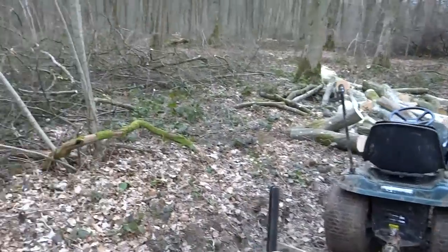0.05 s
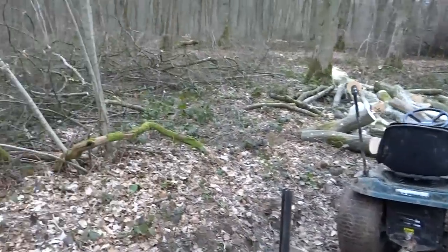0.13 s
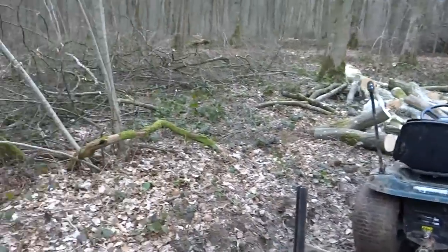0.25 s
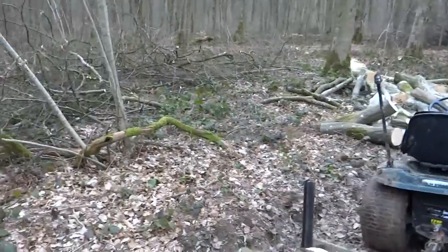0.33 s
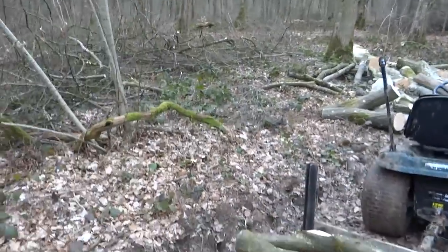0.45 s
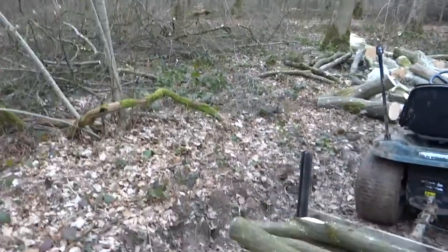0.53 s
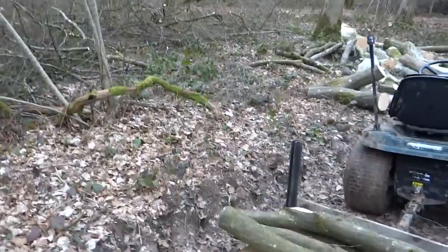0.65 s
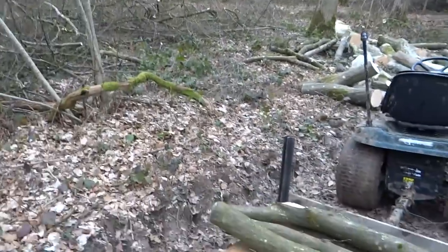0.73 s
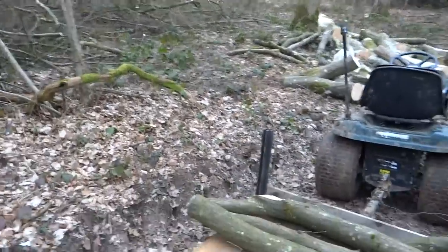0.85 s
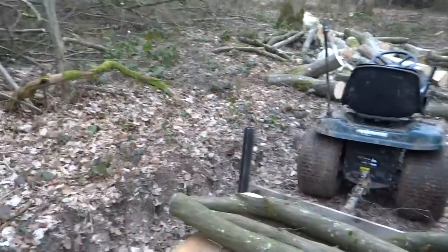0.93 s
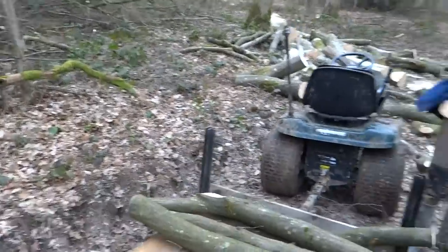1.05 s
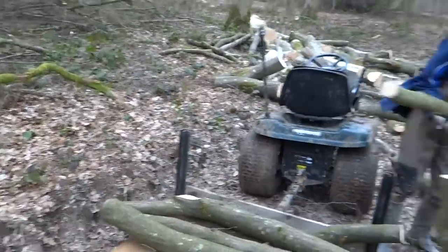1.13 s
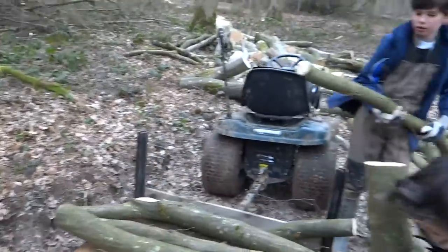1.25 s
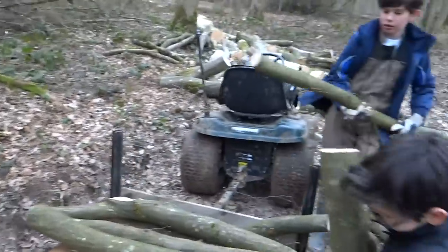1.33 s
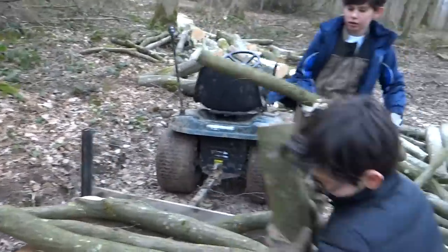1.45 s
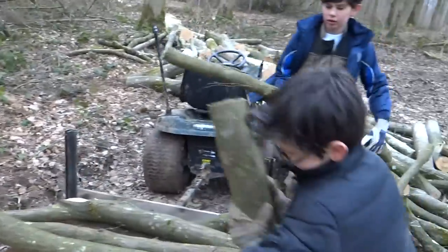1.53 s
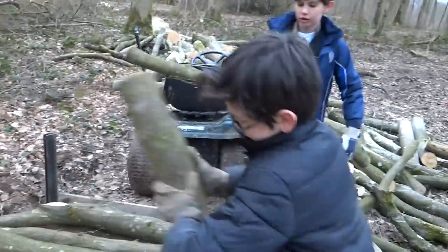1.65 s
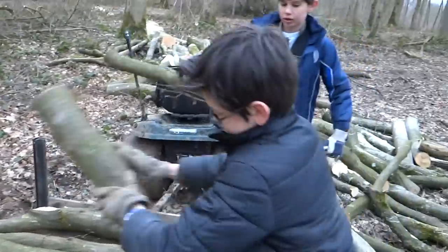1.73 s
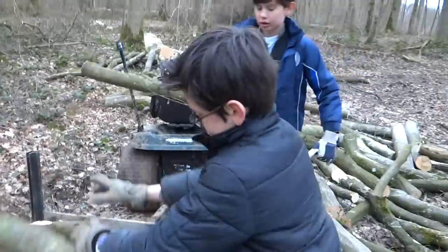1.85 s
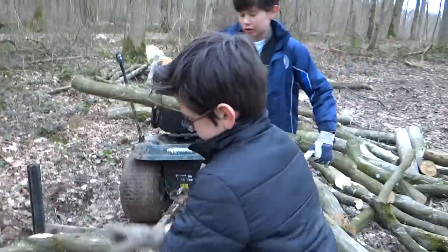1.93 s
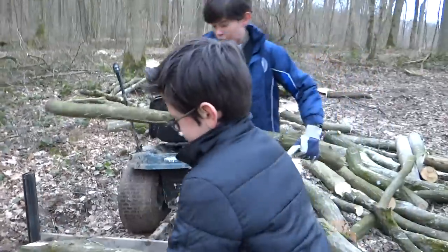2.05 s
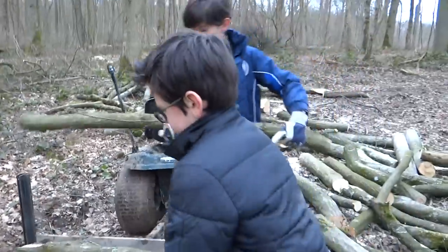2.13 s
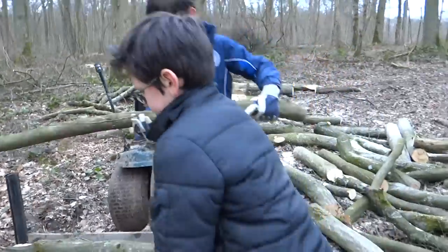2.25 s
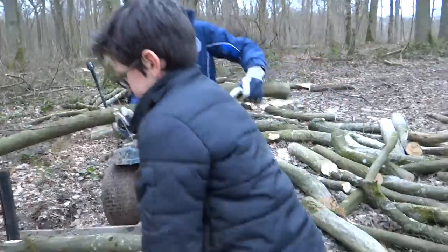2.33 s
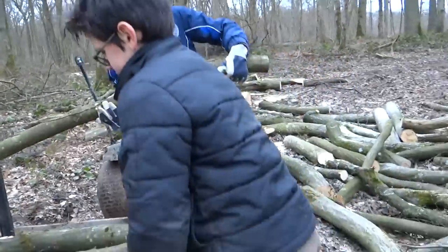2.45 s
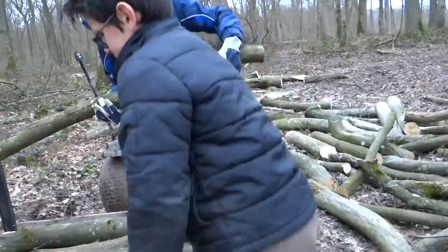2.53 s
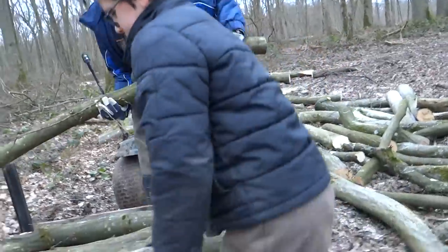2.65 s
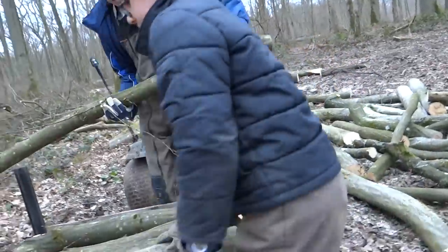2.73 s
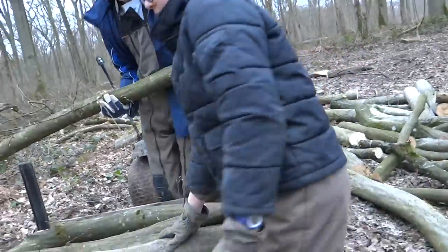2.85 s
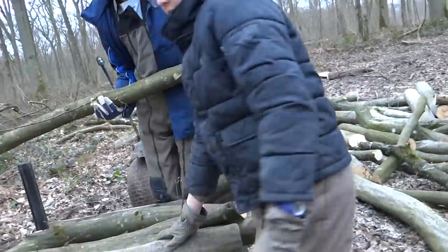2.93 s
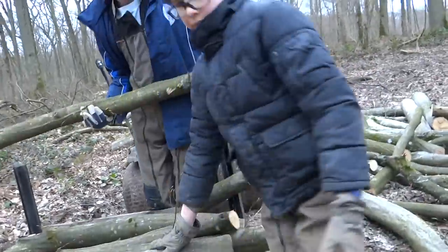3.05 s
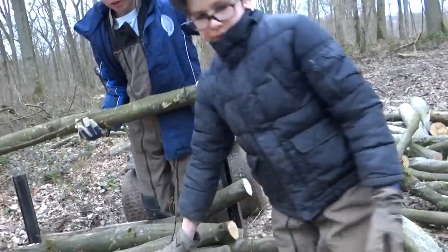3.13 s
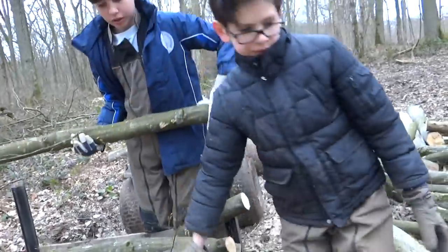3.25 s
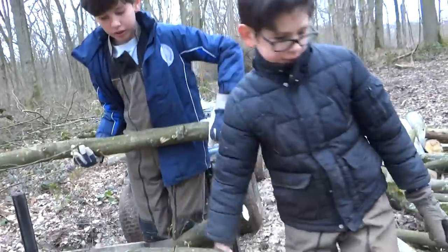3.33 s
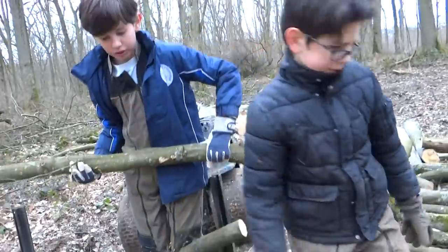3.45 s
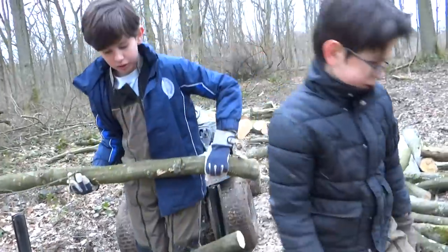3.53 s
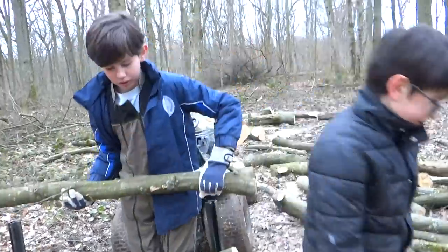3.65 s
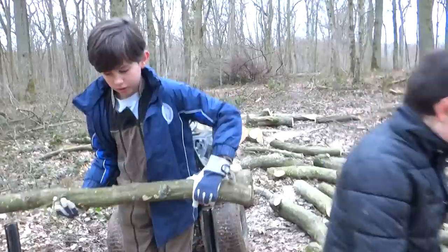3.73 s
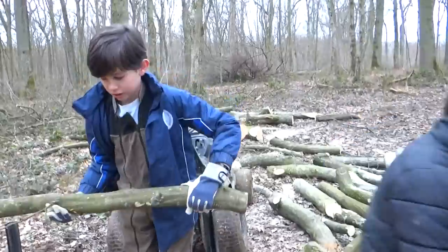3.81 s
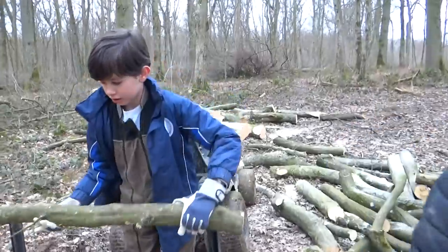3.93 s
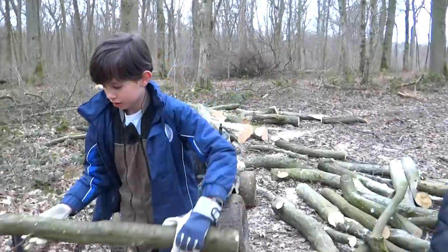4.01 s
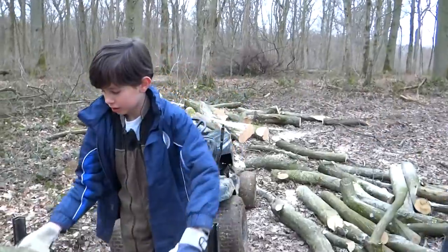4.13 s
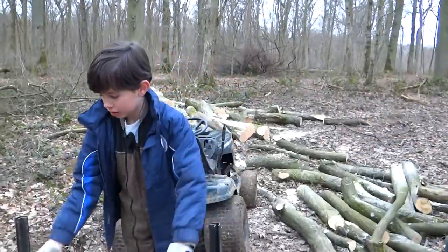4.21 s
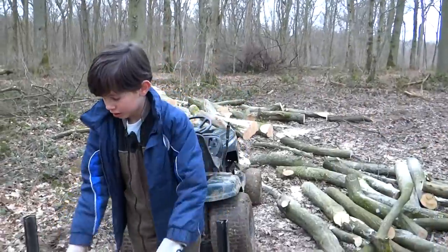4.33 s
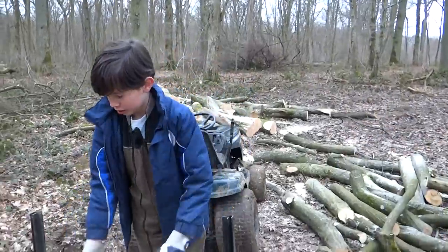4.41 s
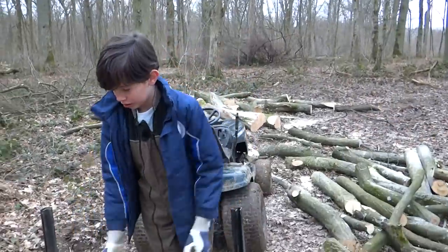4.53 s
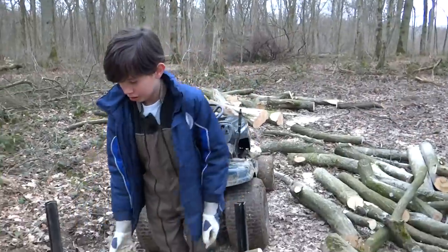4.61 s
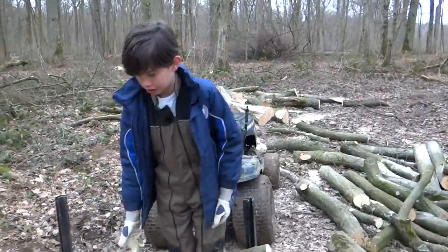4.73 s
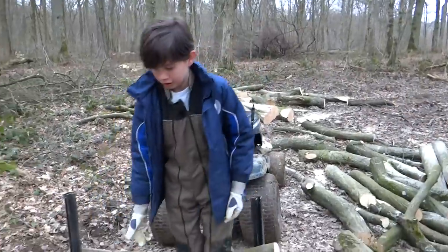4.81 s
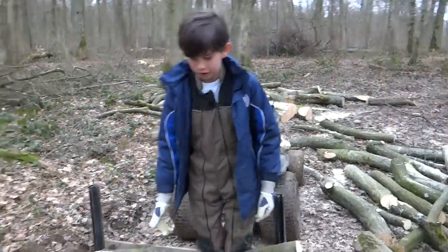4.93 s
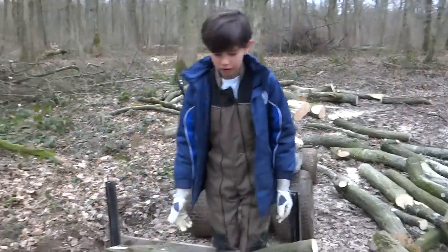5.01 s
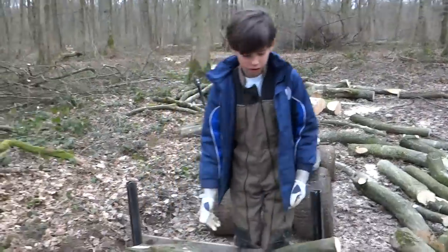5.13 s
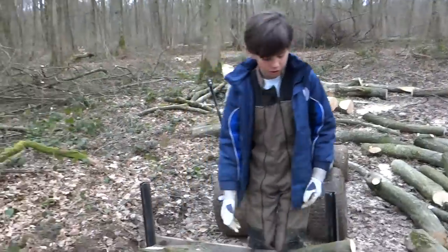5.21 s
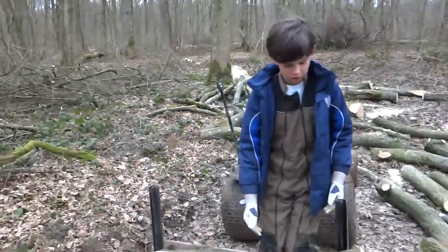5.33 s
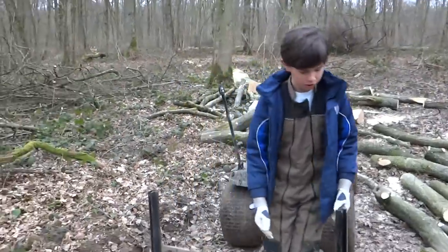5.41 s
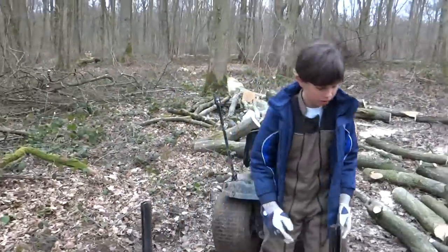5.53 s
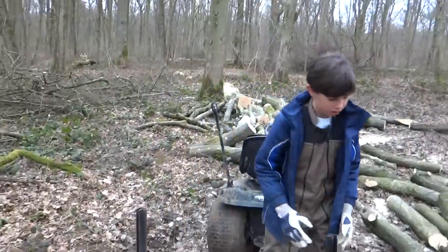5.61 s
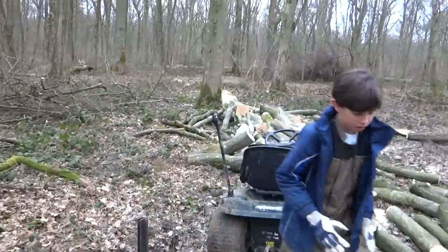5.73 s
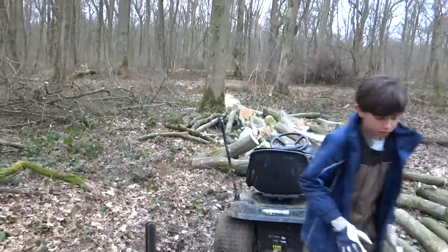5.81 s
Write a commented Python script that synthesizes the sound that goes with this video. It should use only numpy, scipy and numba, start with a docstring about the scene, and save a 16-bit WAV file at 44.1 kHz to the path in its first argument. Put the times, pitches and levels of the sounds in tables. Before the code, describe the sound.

Close to the microphone, a log bangs onto a trailer load at once, booming and clattering for a quarter second. Cloth rustles quietly, then a soft bump leads to a second big tumbling crash. After a near-silent gap come brisk jacket and leaf rustle, glove scuffs and a tiny bark squeak, then a third hard landing with snaps. Open woodland, with a faint dull echo from the trunks.

```python
"""Logs dropped on a trailer

Logs land one by one on a small trailer in a wood: blows and tumbling ring modes of the bed and the logs. Cloth,
gloves and dry leaves rustle, scrape and snap as filtered noise grains; a struck part rings briefly and rubbing
bark squeaks, both as rough tones. Low rumble and a far hush are shaped noise; the load and tree trunks send
back echoes of decaying noise. Two microphone ports behind a casing hear it all, and a limiter holds down the
loudest moments."""
import sys
import numpy as np
from scipy import signal
from scipy.fft import rfft, irfft, next_fast_len
from scipy.io import wavfile
from scipy.ndimage import uniform_filter1d, minimum_filter1d
from numba import njit

SR = 44100
rng = np.random.default_rng(int(sys.argv[2]) if len(sys.argv) > 2 else 0)


def to_wav(s):
    """Save 16-bit WAV."""
    ch = np.atleast_2d(s).T  # columns
    pcm = np.round(np.clip(ch, -1, 1) * 32767)  # PCM
    wavfile.write(sys.argv[1], SR, pcm.astype(np.int16))


N = 258867
T = np.arange(N) / SR
SIZE = next_fast_len(N + 4096)
BINS = np.arange(SIZE // 2 + 1) * SR / SIZE

# Distant wood, shape of its spectrum. Each row: frequency in Hz, relative density in dB per Hz.
AIR_SPECTRUM = [(25, 22.5), (60, 4.5), (250, 6), (800, -16.5), (3000, -7.5), (9000, -27.5), (12500, -9),
                (16000, -31)]
# Wind and handling on the microphone. Each row: time in seconds, middle level in dB.
RUMBLE_LEVELS = [(0.0, -51.5), (1.1, -65), (1.3, -36.5), (1.93, -47), (2.1, -86), (5.87, -86)]
# How much cloth and leaves move. Each row: time in seconds, hiss level in dB.
RUSTLE_LEVELS = [(0.0, -44.5), (0.174, -47.5), (0.39, -40), (0.42, -48), (1.2, -58.5), (1.59, -51),
                 (1.93, -54), (3.1, -58.5), (3.25, -49.5), (3.28, -45.5), (3.41, -46), (3.46, -51.5),
                 (3.63, -47.5), (3.655, -41.5), (3.72, -38.5), (3.76, -36), (3.88, -36), (3.93, -44),
                 (4.07, -37.5), (4.13, -42.5), (4.2, -41.5), (4.39, -43), (4.45, -47), (5.1, -58),
                 (5.36, -52.5), (5.45, -57.5), (5.87, -56.5)]
# Rough tones: first a brief ring of something struck, then rubbing bark. Each row: start in seconds, length in
# seconds, pitch in Hz, level in dB.
ROUGH_TONES = [(0.083, 0.1, 354.4, -39.5), (3.883, 0.038, 1150, -32), (3.911, 0.021, 1150, -23)]
# Twigs snapping and gloves slapping. Each row: start in seconds, body level in dB, hiss level in dB,
# t60 in seconds, centre of the body in Hz.
TWIG_SNAPS = [(0.145, -27, -56.5, 0.014, 1580), (1.542, -39.5, -40.5, 0.022, 2380),
              (1.61, -38, -39.5, 0.078, 2020), (1.713, -31.5, -36.5, 0.012, 2480),
              (1.973, -23, -38, 0.015, 1200), (2.002, -16.5, -33, 0.41, 1930),
              (3.412, -40.5, -41.5, 0.03, 1520), (4.399, -25, -39.5, 0.22, 1820),
              (4.626, -27, -26, 0.065, 2360), (4.968, -46.5, -49.5, 0.36, 1380),
              (5.468, -38, -34, 0.23, 1465), (5.634, -61, -44, 0.066, 900)]
# Blows of a log on the load. Each row: start in seconds, boom of the bed in dB, knock of the wood in dB,
# boom pitch in Hz, knock pitch in Hz.
LOG_BLOWS = [(0.399, -2.5, -13.5, 119.2, 607), (0.42, -10.5, 0, 213.5, 2380),
             (0.461, -5.5, -1.5, 260, 1600), (0.509, -3.5, -14, 304, 1220), (0.527, -6.5, -21, 251, 1940),
             (0.546, -15, -10, 112.5, 2280), (0.572, -9.5, -12.5, 114.4, 1295),
             (0.589, 1.5, -4, 193.7, 655), (0.645, -15, -31, 115, 880), (0.695, -14.5, -33, 103.2, 690),
             (0.884, -26.5, -55, 113.7, 603), (0.974, -19.5, -56, 120.3, 600),
             (1.29, -20.5, -35.5, 172.4, 480), (1.409, -17, -36.5, 126, 475), (1.71, -34, -31, 265, 1100),
             (1.817, -9, -25.5, 164.4, 510), (1.973, 1, -19.5, 206, 583), (1.983, -13.5, -9.5, 172.5, 1860),
             (2.006, -10, -5, 159.8, 2400), (2.017, -4, -8, 142.3, 990), (2.053, 2, 3.5, 267.7, 1230),
             (2.072, -1.5, -4.5, 152.3, 810), (2.103, -4, -2.5, 295.7, 1120),
             (2.137, -3.5, -17, 121.1, 592), (2.211, -4, -16.5, 151.6, 665), (2.24, -18, -8.5, 176, 1580),
             (2.267, -8.5, -17.5, 287, 2300), (2.328, -8, -19.5, 238.7, 1360),
             (4.405, -13, -6.5, 293, 1166), (4.446, -0.5, -12, 172, 1560), (4.469, 3, -5, 146, 1750),
             (4.498, -7, -2.5, 153.4, 863), (4.515, -11, -9.5, 274, 1720), (4.567, -15.5, -12, 203, 1040),
             (4.663, -11, -13, 115.5, 586), (4.671, -3.5, -18.5, 245, 980), (4.69, -9.5, -19.5, 146.5, 780),
             (4.761, -10, -49, 118.4, 605), (4.815, -24, -40.5, 129.6, 594),
             (5.482, -35.5, -32.5, 234, 665)]
# Modes of the trailer bed and load. Each row: frequency in Hz, level in dB, free t60 in seconds.
BED_MODES = [(53.9, -12.5, 0.64), (91.3, -10, 0.42), (120.3, -3, 0.38), (145.2, -4, 0.28),
             (172.3, 0.5, 0.19), (197.5, -1, 0.31), (237.3, -1.5, 0.17), (273.7, 2.5, 0.15),
             (303, 2.5, 0.1), (347, 0.5, 0.065), (411, -9.5, 0.11)]
# Modes of the logs' wood. Each row: frequency in Hz, level in dB, free t60 in seconds.
WOOD_MODES = [(436.7, 2, 0.031), (484, 4, 0.026), (550, 5.5, 0.022), (634, -1.5, 0.045), (720, 1.5, 0.031),
              (824, 1.5, 0.037), (989, -0.5, 0.044), (1164, 4, 0.029), (1415, 1, 0.028),
              (1621, -9.5, 0.019), (1695, -4, 0.013), (1865, -0.5, 0.0091), (2200, 0.5, 0.013),
              (2880, 9.5, 0.0018)]
# A steel rail of the trailer. Each row: frequency in Hz, level in dB, t60 in seconds.
RAIL_MODES = [(304, -32, 0.7)]
# Logs tumbling after a landing. Each row: start in seconds, length in seconds, relative boom in dB,
# knock over boom in dB, lively part in seconds.
LOG_TUMBLES = [(0.403, 0.23, -9, 1, 0.14), (1.289, 0.23, -38.5, -17.5, .02),
               (1.805, 0.11, -26.5, -17.5, 0.015), (1.993, 0.28, -11, 4, 0.073),
               (2.24, 0.11, -24.5, 5, 0.028), (4.403, 0.16, -9.5, 1.35, 0.071),
               (4.653, 0.15, -26.5, 0, 0.018)]
# Bark scraped by gloves. Each row: start in seconds, length in seconds, level in dB, centre in Hz.
GLOVE_SCUFFS = [(1.527, 0.12, -47.5, 547), (3.574, 0.06, -47, 1160), (3.958, 0.051, -35, 1320),
                (4.031, 0.072, -34.5, 1080), (4.133, 0.1, -42, 1930), (5.525, 0.041, -50.5, 1740)]
# The load lies to the left. Each row: frequency in Hz, lead of the left in radians.
LOGS_LEAD = [(40, .4), (250, .5), (1100, .15), (1700, 0)]
# Colour of the microphone behind its casing. Each row: frequency in Hz, gain in dB.
CASING_GAIN = [(20, -16.5), (100, 2), (2800, 1), (3150, -6), (3520, -12), (5700, -2.5), (7400, 5.5),
               (9200, 5.5), (10600, 0), (11400, -13), (13200, -15), (14900, -17), (17000, -9)]
# The two ports. Each row: frequency in Hz, left minus right in dB, lead of the left in radians.
PORT_DIFFERENCE = [(60, 0, 0), (250, -.3, .15), (520, -2.5, .35), (1100, -2.4, .05), (1700, -4.5, -.08),
                   (2560, -11, -.65), (3150, -14, -1.4), (3900, -6, -3.5), (5900, 0, -5.35),
                   (12000, 0, -6.28)]

AIR_DB, AIR_ALIKE = -51.5, 0.98  # level; share of power common to left and right
RISE_SHARE = 0.026  # rise time of a burst as a share of its decay
JOLT_DB, JOLT_T60_S = -8.5, 0.43  # a landing shakes the ground: level against the tumble's boom, decay

RUSTLE_RATE, RUSTLE_SCATTER_DB, RUSTLE_HZ = 1800, 2.5, 1250  # grains per second, size spread, body pitch
FLUTTER_DB, SWELL_DB = 1.3, 1.2  # spread of fast and of slower level changes
CRISP_HZ, CRISP_DB = 3700, 5  # dry leaves lift the bottom of the hiss
RUSTLE_USUAL_DB, BRIGHTEN = -58.5, 0.17  # level where body equals hiss; dB of body lost per dB louder
# bark crumbs shaken loose: hiss against the tumble's knock, body over hiss, fade
GRIT_DB, GRIT_BODY_DB, GRIT_FADE_DB_S = -35, 16.5, 85

SPOT_OCT, KNOCK_OCT = 1, 0.93  # how widely a blow spreads over bed and wood modes round its pitch
LEAD_DB, KNOCK_LEAD_DB = 5.5, 1  # extra level of the bed and wood mode nearest a blow's pitch
SHIFT_MAX = 0.12  # largest share by which the load pulls that mode on to the blow's pitch
REST_S, REST_DB_S = 0.1, 596  # a log bounces free this long, then lies down and damps the ring
THUD_CONTACT_S = 0.0028  # push of a blow on the bed
BED_CONTACT_S, WOOD_CONTACT_S = 0.0012, 0.00031  # push on rail and tumbled bed; push on any wood
RAIL_S = 2.36  # when a log catches the rail

TUMBLE_RATE, TUMBLE_SCATTER_DB, TUMBLE_DB = 700, 2.3, -1  # contacts per second, size spread, overall trim
TUMBLE_RISE_S, TUMBLE_SAG_DB_S = 0.0062, 48  # onset, slow sag
SETTLE_DB_S = 197  # extra fall once at rest
SOFTEN_DB_S = 56  # after the lively part the knock sinks below the boom
ROLL_DAMP = 0.49  # rolling logs shorten the bed's t60 to this share
BED_LIFT = 1.13  # slope towards the upper bed modes while the tumbling is lively
HARD_DB = 0.27  # knock over boom from which a contact reaches all wood modes evenly
DULL_PER_DB = 3  # spectral slope gained for each dB that the knock falls below that
TICK_DB = -35.5  # gain of bark cracking at each small contact

CLUTTER_DB, CLUTTER_T60_S = -9.5, 0.026  # first reflections off the load and tractor
TRUNKS_DB, TRUNKS_T60_S, TRUNKS_ALIKE = -26, 1.316, 0.75
TRUNKS_LOW_HZ, TRUNKS_HIGH_HZ = 475, 2980

LIMIT_DB, LIMIT_RATIO, RELEASE_S, AHEAD_S = -4.5, 9, 0.02, 0.002
TOP_HZ = 15850


def undb(db):
    """Decibels to gain."""
    return 10 ** (np.asarray(db) / 20)


def unit(x):
    """Scale to rms 1."""
    return x / np.sqrt(np.mean(x ** 2))


def along(table, hz):
    """Read a (Hz, value) table on a log-frequency axis."""
    f, v = np.transpose(table)
    return np.interp(np.log(np.maximum(hz, 1)), np.log(f), v)


def band(x, lo_hz, hi_hz):
    """Band-pass."""
    edges = [lo_hz, min(hi_hz, SR / 2.1)]
    return signal.sosfilt(signal.butter(2, edges, "band", fs=SR, output="sos"), x)


def walk(rate):
    """Random levels, slewed over 1 / rate seconds from one to the next; rms about 1."""
    k = int(SR / rate)
    steps = np.repeat(rng.standard_normal(N // k + 1), k)
    return unit(uniform_filter1d(steps, k)[:N])


def burst(s, db, t60):
    """Envelope of sudden noises that die away by 60 dB in t60 seconds."""
    out = np.zeros(N)
    for start, gain, decay in zip(s, undb(db), np.broadcast_to(t60, len(s))):
        i = int(start * SR)
        n = min(int(decay * SR), N - i)
        age = np.arange(n) / (decay * SR)
        out[i:i + n] += gain * np.minimum(age / RISE_SHARE, 1) * np.exp(-np.log(1000) * age)
    return out


def grains(rate, scatter_db):
    """Sparse clicks of uneven size, rms 1."""
    hit = rng.random(N) < rate / SR
    return unit(hit * rng.standard_normal(N) * undb(scatter_db * rng.exponential(size=N)))


def heard(x, hz):
    """Scale so that the level is as heard behind the casing near hz."""
    return unit(x) / undb(along(CASING_GAIN, hz))


def alike(share, size):
    """Two noises that have a share of their power in common."""
    share = np.clip(share, 0, 1)
    both, left, right = rng.standard_normal((3, size))
    return np.sqrt(share) * both + np.sqrt(1 - share) * np.array([left, right])


def pair(x, hz, db, rad):
    """Left and right of a spectrum that differ by db in level and rad in phase."""
    half = undb(along(np.c_[hz, db], BINS) / 2) * np.exp(0.5j * along(np.c_[hz, rad], BINS))
    return irfft(x * np.array([half, 1 / half]), SIZE)[:, :N]


def soften(x, contact_s):
    """A contact pushes for a moment, which rounds off its attack."""
    push = np.hanning(int(contact_s * SR) + 3)
    return signal.lfilter(push / push.sum(), [1], x)


def ring(modes, s, gain, share, contact_s):
    """Impulses at times s ring every mode; share holds how much each impulse couples to each mode."""
    out, at = np.zeros(N), np.minimum((s * SR).astype(int), N - 1)
    for k, (hz, db, t60) in enumerate(modes):
        pole = np.exp(2j * np.pi * hz / SR - np.log(1000) / (t60 * SR))
        push = np.bincount(at, gain * share[:, k], N)
        out += undb(db) * signal.lfilter([1], [1, -pole], push).imag
    return soften(out, contact_s)


def air():
    """The far hush of the wood: shaped noise, nearly the same left and right, swelling slowly."""
    size = next_fast_len(N)
    hz = np.arange(size // 2 + 1) * SR / size
    hush = irfft(rfft(alike(AIR_ALIKE, size)) * undb(along(AIR_SPECTRUM, hz)), size)[:, :N]
    return unit(hush) * undb(AIR_DB + 0.29 * walk(1.1))


def rumble():
    """Low gusty pressure on the microphone, and the jolt of each landing, as low-band noise."""
    s, db = np.transpose(RUMBLE_LEVELS)
    start, _, boom_db = np.transpose(LOG_TUMBLES)[:3]
    gusts = undb(np.interp(T, s, db) + 7.1 * walk(6.9))
    jolts = burst(start, boom_db + JOLT_DB, JOLT_T60_S)
    return unit(band(rng.standard_normal(N), 19, 96)) * (gusts + jolts)


def rustle():
    """Fine crackle of nylon, leaves and falling bark crumbs: a hiss and a duller body that flutter apart."""
    move_db = np.interp(T, *np.transpose(RUSTLE_LEVELS))
    start, _, boom_db, knock_db, _ = np.transpose(LOG_TUMBLES)
    grit = burst(start, boom_db + knock_db + GRIT_DB, 60 / GRIT_FADE_DB_S)
    crackle = grains(RUSTLE_RATE, RUSTLE_SCATTER_DB) + 1.04 * rng.standard_normal(N)
    crisp = crackle + undb(CRISP_DB) * band(crackle, CRISP_HZ / 1.01, CRISP_HZ * 1.34)
    hiss = heard(band(crisp, 3300, 20000), 8500)
    hiss *= undb(FLUTTER_DB * walk(60) + SWELL_DB * walk(22))
    body = unit(band(crackle, RUSTLE_HZ / 3.08, RUSTLE_HZ * 1.815)) * undb(FLUTTER_DB * walk(35))
    # louder movement brightens: the body grows less than the hiss
    body_db = move_db - BRIGHTEN * (move_db - RUSTLE_USUAL_DB)
    return (undb(move_db) + grit) * hiss + (undb(body_db) + undb(GRIT_BODY_DB) * grit) * body


def squeaks():
    """Each rough tone comes in quickly, holds with a weak half-pitch undertone and dies away: a brief struck
    ring, or bark that catches and lets go."""
    out, waver = np.zeros(N), 1 + 0.01 * walk(200)
    rough = undb(3.5 * walk(300))
    for s, length, hz, db in ROUGH_TONES:
        swell = np.sin(np.pi * np.sqrt(np.clip((T - s) / length, 0, 1)))
        turn = np.pi * np.cumsum(hz * waver) / SR  # phase at half the pitch
        tone = np.sin(2 * turn) + 0.12 * np.sin(turn) + 0.16 * np.sin(3 * turn)
        out += undb(db) * swell * rough * tone
    return out


def snaps():
    """Short bursts of crackle, each with the pitch of what broke or slapped, under a band of hiss."""
    s, body_db, hiss_db, t60, hz = np.transpose(TWIG_SNAPS)
    crackle = grains(4000, 1.7)
    body = np.zeros(N)
    for start, db, decay, centre in zip(s, body_db, t60, hz):
        body += burst([start], [db], decay) * unit(band(crackle, centre / 1.5, centre * 1.5))
    return body + burst(s, hiss_db, t60) * heard(band(crackle, 7400, 11200), 8500)


def near_pitch(modes, hz, octaves):
    """Weights of the modes round each pitch, unit power."""
    spot = np.exp(-(np.log2(np.array(modes)[:, 0] / hz[:, None]) / octaves) ** 2 / 2)
    return spot / np.sqrt(np.sum(spot ** 2, axis=1, keepdims=True))


def strike(modes, s, blow_db, pitch_hz, octaves, contact_s, lead_db):
    """Each blow rings the modes round its pitch, with either sign; the load pulls the nearest mode to it."""
    hz, db, t60 = np.transpose(modes)
    chance = rng.standard_normal((len(s), 2, len(hz)))
    size = near_pitch(modes, pitch_hz, octaves) * np.sign(chance[:, 0])
    size = size * undb(blow_db[:, None] + db + 2 * chance[:, 1])
    age = T[:SR // 2, None]
    fade = 1000.0 ** (-age / t60) * undb(-REST_DB_S * np.maximum(age - REST_S, 0))
    out = np.zeros(N + len(age))
    for start, pitch, gain in zip((s * SR).astype(int), pitch_hz, size):
        lead = np.argmin(np.abs(np.log(hz / pitch)))
        lead_gain = undb(lead_db * (hz == hz[lead]))
        # all modes move with the leading one
        shift = np.clip(pitch / hz[lead], 1 - SHIFT_MAX, 1 + SHIFT_MAX)
        tone = np.sin(2 * np.pi * hz * shift * age)
        out[start:start + len(age)] += (fade * tone) @ (gain * lead_gain)
    return soften(out[:N], contact_s)


def blows():
    """Every blow booms the bed and knocks the wood as decaying modes; a log also catches the rail."""
    s, boom_db, knock_db, boom_hz, knock_hz = np.transpose(LOG_BLOWS)
    rail = ring(RAIL_MODES, np.array([RAIL_S]), np.ones(1), np.ones((1, len(RAIL_MODES))), BED_CONTACT_S)
    boom = strike(BED_MODES, s, boom_db, boom_hz, SPOT_OCT, THUD_CONTACT_S, LEAD_DB)
    knock = strike(WOOD_MODES, s, knock_db, knock_hz, KNOCK_OCT, WOOD_CONTACT_S, KNOCK_LEAD_DB)
    return boom + knock + rail


def dull(knock_db):
    """Soft contacts reach the upper wood modes less; knock_db is knock minus boom."""
    hz = np.array(WOOD_MODES)[:, 0]
    tilt = (hz / hz[0]) ** (DULL_PER_DB * np.minimum(knock_db - HARD_DB, 0)[:, None])
    return tilt / np.sqrt(np.mean(tilt ** 2, axis=1, keepdims=True))


def tumbling():
    """A dense run of small knocks between logs drives bed and wood modes, and bark ticks at each."""
    s = np.flatnonzero(rng.random(N) < TUMBLE_RATE / SR) / SR
    size = unit(undb(TUMBLE_SCATTER_DB * rng.exponential(size=len(s))))
    boom, knock = np.zeros(len(s)), np.zeros(len(s))
    for start, length, boom_db, knock_db, lively in LOG_TUMBLES:
        age = np.maximum(s - start, 0)
        db = boom_db - TUMBLE_SAG_DB_S * age - SETTLE_DB_S * np.maximum(age - length, 0)
        gain = np.minimum(age / TUMBLE_RISE_S, 1) * undb(db)
        boom += gain
        knock += gain * undb(knock_db - SOFTEN_DB_S * np.maximum(age - lively, 0))
    tilt = dull(20 * np.log10((knock + 1e-9) / (boom + 1e-9)))
    bed = np.array(BED_MODES) * [1, 1, ROLL_DAMP]
    hz = bed[:, 0]
    lift = (hz / np.median(hz)) ** (BED_LIFT * np.minimum(knock / (boom + 1e-9), 1)[:, None])
    out = np.zeros(N)
    for modes, gain, reach, contact_s in ((bed, boom, lift, BED_CONTACT_S),
                                          (WOOD_MODES, knock, tilt, WOOD_CONTACT_S)):
        # a mode struck r times a second holds a power of r g^2 t60 / (4 ln 1000)
        power = sum(undb(2 * db) * t60 for _, db, t60 in modes) * TUMBLE_RATE / (4 * np.log(1000))
        share = reach * rng.standard_normal((len(s), len(modes)))
        out += ring(modes, s, gain * size / np.sqrt(power), share, contact_s)
    tick = np.bincount((s * SR).astype(int), knock * size * rng.standard_normal(len(s)), N)
    tick = tick * np.sqrt(SR / TUMBLE_RATE)
    return undb(TUMBLE_DB) * (out + undb(TICK_DB) * band(tick, 3700, 7500))


def scuffs():
    """Coarse grains of a short rub, heard through the bark's broad resonance."""
    out, grit = np.zeros(N), grains(2500, 0.32)
    for s, length, db, hz in GLOVE_SCUFFS:
        swell = np.sqrt(np.abs(np.sin(np.pi * np.clip((T - s) / length, 0, 1)))) * (T < s + length)
        rub = band(band(grit, hz / 2, hz * 2), hz / 2, hz * 2)
        out += undb(db) * swell * unit(rub)
    return out


def scatter(x, echo, db):
    """Convolve with a left and right echo scaled to a mean energy of db."""
    echo = echo / np.sqrt(np.sum(echo ** 2) / 2)
    return undb(db) * signal.fftconvolve(x[None], echo, axes=1)[:, :N]


def clutter(x):
    """Things close by reflect the sound at once, differently into each port: brief decaying noise."""
    t = np.arange(int(0.06 * SR)) / SR
    echo = alike(0, len(t)) * 1000.0 ** (-t / CLUTTER_T60_S)
    return scatter(x, band(echo, 348, 9000), CLUTTER_DB)


def trunks(x):
    """Tree trunks scatter the sound back as a dull, slowly dying wash."""
    t = np.arange(int(1.5 * SR)) / SR
    echo = alike(TRUNKS_ALIKE, len(t)) * 1000.0 ** (-t / TRUNKS_T60_S)
    echo = echo * (1 - np.exp(-t / 0.0028))  # soft onset
    return scatter(x, band(echo, TRUNKS_LOW_HZ, TRUNKS_HIGH_HZ), TRUNKS_DB)


def scene():
    """Logs, hands and feet near the microphone, their echoes and the wood behind."""
    logs = blows() + tumbling()
    hz, rad = np.transpose(LOGS_LEAD)
    near = pair(rfft(logs, SIZE), hz, 0 * hz, rad)
    hands = rustle() + snaps() + scuffs() + squeaks()
    return near + hands + clutter(logs + hands) + rumble() + trunks(logs) + air()


@njit
def follow(x, attack, release):
    """Envelope that rises fast and falls slowly."""
    y, e = np.empty(len(x)), 0.0
    for i in range(len(x)):
        e += (x[i] - e) * (attack if x[i] > e else release)
        y[i] = e
    return y


def record(dry):
    """Casing colour, two ports that differ in level and phase, a shared limiter and the top cut."""
    # causal response of the casing from the folded cepstrum of its log gain
    cep = irfft(np.log(undb(along(CASING_GAIN, np.arange(1025) * SR / 2048))))
    cep[1:1024] *= 2
    cep[1025:] = 0
    casing = rfft(irfft(np.exp(rfft(cep))), SIZE)
    x = pair(rfft(dry, SIZE) * casing, *np.transpose(PORT_DIFFERENCE))
    # the limiter looks a moment ahead and turns both sides down together
    window = 2 * int(AHEAD_S * SR) + 1
    peak = -minimum_filter1d(-np.abs(x).max(axis=0), window)
    loud = uniform_filter1d(follow(peak, 0.52, 1 / (RELEASE_S * SR)), window)
    x = x * np.minimum(undb(LIMIT_DB) / (loud + 1e-9), 1) ** (1 - 1 / LIMIT_RATIO)
    return signal.sosfilt(signal.ellip(10, 0.2, 80, TOP_HZ, fs=SR, output="sos"), x)


dry = scene()
out = record(dry)
to_wav(out)
```